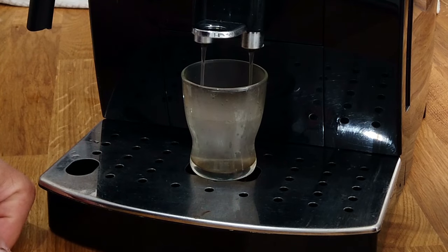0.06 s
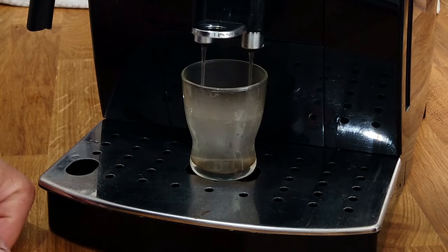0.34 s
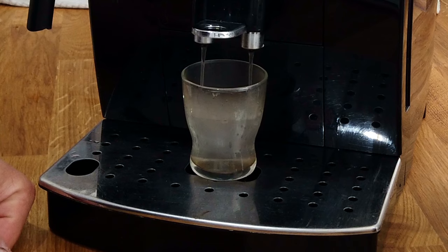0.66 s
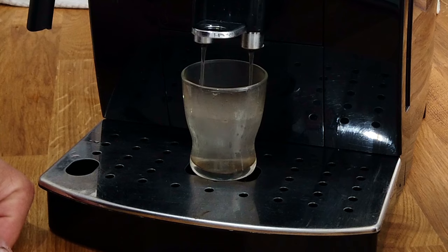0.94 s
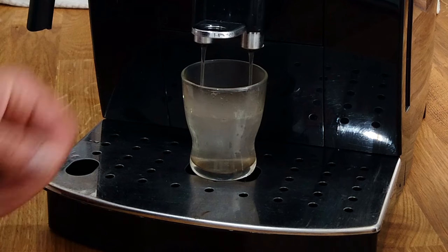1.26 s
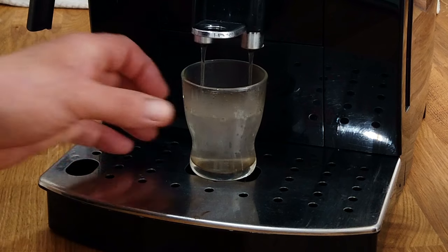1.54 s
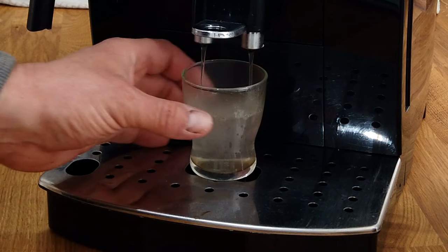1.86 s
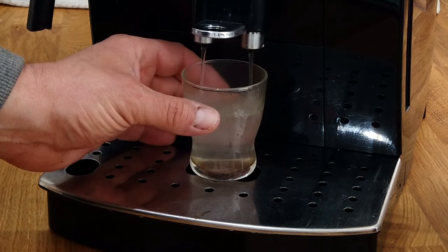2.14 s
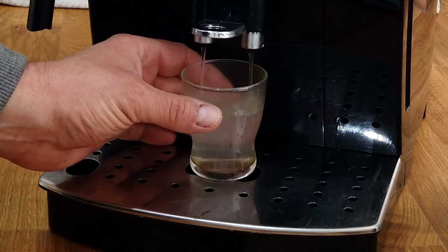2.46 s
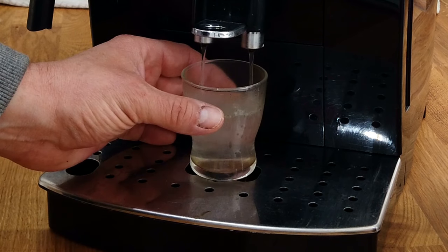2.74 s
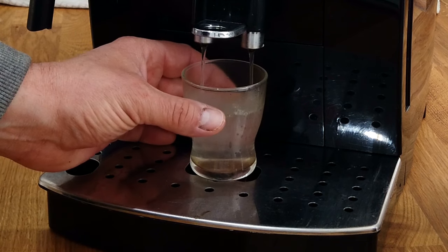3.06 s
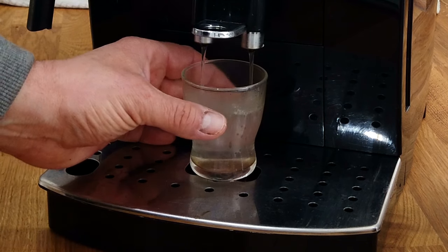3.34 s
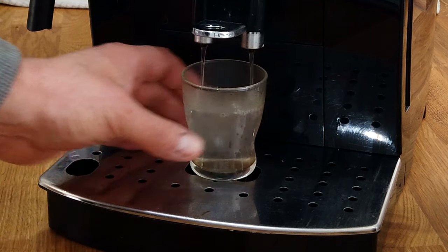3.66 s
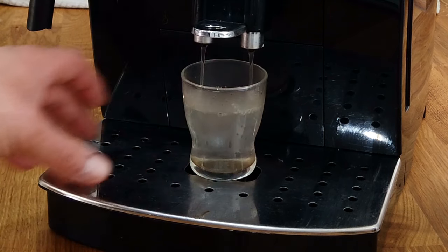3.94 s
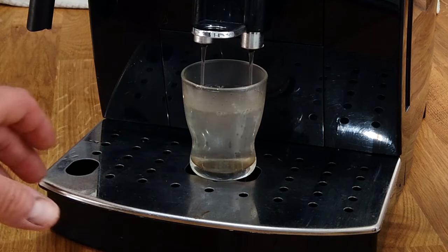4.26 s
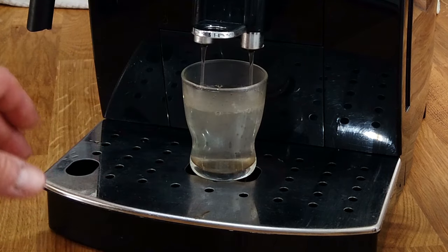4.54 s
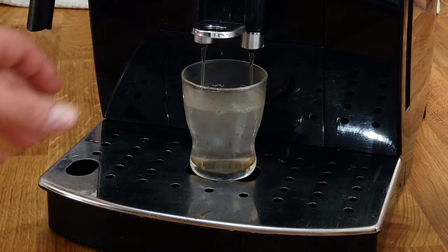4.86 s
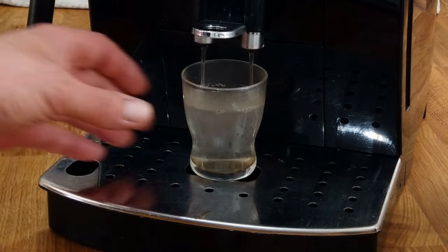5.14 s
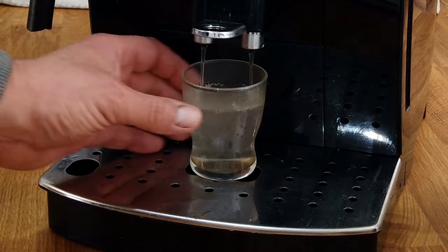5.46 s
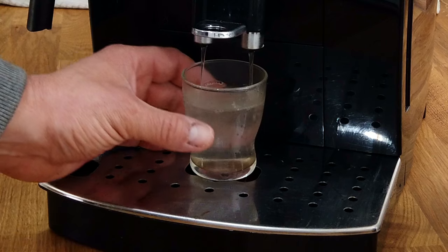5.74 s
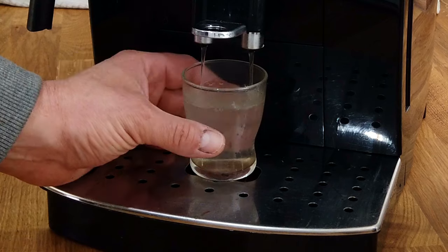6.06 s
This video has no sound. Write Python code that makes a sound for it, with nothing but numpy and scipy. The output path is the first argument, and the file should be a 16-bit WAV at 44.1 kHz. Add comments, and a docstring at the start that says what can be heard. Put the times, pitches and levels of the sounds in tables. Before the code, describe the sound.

A coffee machine pump throbs and rattles rapidly while hot water trickles and plinks into a glass.

```python
"""A coffee machine runs hot water into a glass. From the start its vibrating pump is on for a few mains
cycles in every eight, six throbs a second: the piston thumps and clacks, panels rattle, the valve hisses,
the water line hoots. Drops plink in the glass. At 3.6 s a hand sets the glass on the drip tray: the
plinks end, the casing is damped and rings differently. The water line sings a few short notes, the valve
sizzles from 5.6 s, and at 6.2 s the glass is dragged off."""
import sys
import numpy as np
from scipy.fft import rfft, irfft, next_fast_len
from scipy.io import wavfile
from scipy.ndimage import map_coordinates

SR = 44100
rng = np.random.default_rng(int(sys.argv[2]) if len(sys.argv) > 2 else 0)


def waveform_to_disk(signal):
    """Save audio, clipped to [-1, 1], as 16-bit WAV at the path in sys.argv[1]."""
    frames = np.transpose(np.atleast_2d(signal))
    scaled = np.clip(frames, -1, 1) * 32767
    samples = np.round(scaled).astype(np.int16)
    wavfile.write(sys.argv[1], SR, samples)


N = 277830

MAINS_HZ, FIRST_BURST_S = 49.885, 0.062
BURST_PERIOD_S = 8 / MAINS_HZ
DROPS_END_S, SET_DOWN_S, SIZZLE_START_S = 3.42, 3.59, 5.57

# Trickle spectrum: (frequency [Hz], level [dB])
STREAM_SPECTRUM = [(20, -18), (40, -29), (70, -4), (110, 16), (250, 13.5), (700, 12), (1200, -6.5),
                   (2100, -6.5), (3800, -11.5), (5200, -13.5), (10000, -23.5), (15800, -30)]
# Water spits; loudest drops: (time [s], relative level [dB], frequency [Hz])
WATER_SPITS = [(0.1935, -41.5, 7400), (1.2856, -39.5, 4550), (1.6127, -33.5, 5060), (2.0093, -37, 5020),
               (2.2563, -40, 4530), (3.248, -38, 4900), (3.3283, -38, 5250), (6.1659, -35, 4900)]
LOUD_DROPS = [(0.1015, -28.5, 1780), (0.1295, -25, 1920), (0.2688, -31, 1960), (0.396, -30, 1980),
              (0.4479, -29, 2140), (0.6484, -28, 2170), (1.0156, -30, 1940), (1.1552, -25, 1903),
              (1.32, -27, 2100), (1.3596, -22.5, 2090), (1.699, -30.5, 2000), (2.0012, -25.5, 1900),
              (2.1615, -24.5, 2180), (2.2283, -27.5, 1960), (2.783, -31.5, 2000), (2.9112, -20, 1925),
              (3.0606, -28, 2060), (3.077, -29.5, 2020), (3.1815, -30.5, 2200)]
# Light taps on the glass: (time [s], relative level [dB])
GLASS_TAPS = [(0.653, -44), (1.502, -43), (1.932, -44), (2.913, -45), (3.3715, -43.5), (3.535, -44),
              (3.6404, -42.5), (4.199, -37.5)]
# Glass knocks on the tray: (time [s], relative level [dB], tray note [Hz])
TRAY_KNOCKS = [(3.599, -28, 264), (3.639, -32, 272), (4.924, -39, 270), (6.248, -29, 201),
               (6.263, -34.5, 177)]
# Glass sliding on steel: (time [s], level [dB])
DRAG_ENVELOPE = [(6.22, -82), (6.245, -62), (6.27, -40), (6.3, -30.5)]
# Knock and scrape spectra: (frequency [Hz], level [dB])
KNOCK_SPECTRUM = [(60, -11), (150, -12), (260, 2.5), (400, -6), (700, -11.5), (1300, -13.5), (2500, -22),
                  (6000, -39), (15000, -45)]
SCRAPE_SPECTRUM = [(60, -22), (150, 7), (380, 7), (800, -10), (1300, -4), (2400, -14), (4500, -16.5),
                   (5700, -5), (6600, -24), (15000, -29)]
# Water line hoot: (frequency [Hz], relative level glass held [dB], relative level glass seated [dB])
HOOT_PARTIALS = [(524.5, -38, -47.5), (606, -42.5, -42.5), (683.6, -44, -39.5), (741.4, -41, -50)]
# Single water line notes: (time [s], level [dB], frequency [Hz], Gaussian width [s])
LINE_NOTES = [(3.85, -39, 665, .016), (4.80, -33.5, 745, .02), (4.887, -31, 700, .008),
              (5.046, -29.5, 701, 0.011), (5.137, -33.5, 695, 0.016)]
# Valve hiss spectrum: (frequency [Hz], level [dB])
VALVE_SPECTRUM = [(1470, 2), (2500, 3), (3220, 0), (3640, -3.5), (4950, 2), (6570, -4), (7370, 0),
                  (8660, -6), (9350, -32), (9640, -6), (11000, -11.5), (12200, -11), (15600, -21.5)]
# Panel spectra with glass held, with glass seated, near the end: (frequency [Hz], level [dB])
PANEL_HELD_SPECTRUM = [(490, -5), (830, 3), (914, 2), (1000, -3), (1170, 5), (1430, -2.5), (1790, -3.5),
                       (1960, -4.5), (2320, -10), (3320, -17), (3500, -50), (4550, -76), (7700, -120)]
PANEL_SEATED_SPECTRUM = [(490, -1), (830, 1.5), (1020, 2), (1100, 0.5), (1380, -7), (1700, -6),
                         (1880, -10.5), (2070, -1.5), (2260, -16.5), (3160, -7.5), (3500, -25), (4550, -11),
                         (7700, -120)]
PANEL_LATE_SPECTRUM = [(490, -18), (830, -3.5), (845, -28), (871, -12), (919, -4), (1110, -13.5),
                       (1570, -19), (2020, -14), (2200, -14.5), (2380, -24), (3500, -56), (4550, -60),
                       (7700, -120)]
# Low housing modes; casing and drip tray modes:
# (frequency [Hz], bandwidth [Hz], level glass held [dB], level glass seated [dB])
HOUSING_MODES = [(116.2, 5.3, 10.5, 9), (118.7, 21.2, 1, -1.5), (220.1, 35.7, 1, -4), (233.5, 7.4, 4, 4.5),
                 (324.5, 86, -9, -11), (336.7, 43.7, -6, -11)]
CASING_MODES = [(419.4, 21.3, 3, -4.5), (435, 10.2, 3.5, -1), (516, 17.5, -4.5, -14),
                (558.8, 19.5, 1, -2.5), (593, 27.6, -2.5, -7), (649, 12.4, 1.5, -6), (732.2, 48, -2, -3),
                (743.1, 25, -1.5, 0), (865, 15, -4, -1.5), (900, 24, -17, -9.5)]
# Drift of pump effort: (time [s], level [dB])
PUMP_EFFORT = [(0.0, 1), (0.8, -0.6), (2.0, 0.0), (3.15, 1.06), (3.7, -0.8), (4.3, -0.4), (5.3, -0.9),
               (5.8, 0.8), (6.3, -0.3)]


def amp(db):
    """Decibels to gain."""
    return 10 ** (np.asarray(db) / 20)


def unit(x):
    """Scale to rms 1."""
    return x / np.sqrt(np.mean(x ** 2) + 1e-20)


def clock():
    """Sample times [s]."""
    return np.arange(N) / SR


def curve(points):
    """(time [s], value) points, interpolated per sample."""
    return np.interp(clock(), *np.transpose(points))


def wobble(knots_per_s):
    """Smooth random curve."""
    return map_coordinates(rng.standard_normal(int(N * knots_per_s / SR) + 4), [clock() * knots_per_s])


def add(track, start_s, sound):
    """Mix a sound into the track."""
    part = track[round(start_s * SR):][:len(sound)]
    part += sound[:len(part)]


def filtered(x, response):
    """Apply a complex frequency response."""
    size = next_fast_len(len(x) + SR // 2)
    return irfft(rfft(x, size) * response(np.fft.rfftfreq(size, 1 / SR)), size)[:len(x)]


def coloured(x, spectrum):
    """Shape by (frequency [Hz], level [dB]) points; rms 1."""
    points_hz, db = np.transpose(spectrum)
    return unit(filtered(x, lambda hz: amp(np.interp(np.log(hz + 1), np.log(points_hz), db))))


def resonate(x, modes):
    """Resonators of alternating sign, (frequency [Hz], bandwidth [Hz], level [dB]); rms 1."""
    def response(hz):
        return sum((-1) ** k * amp(db) * 1j * hz * width_hz / (mode_hz ** 2 - hz ** 2 + 1j * hz * width_hz)
                   for k, (mode_hz, width_hz, db) in enumerate(modes))
    return unit(filtered(x, response))


def ping(hz, t60_s):
    """Damped sine."""
    t = np.arange(6000) / SR
    return np.sin(2 * np.pi * hz * t) * amp(-60 * t / t60_s)


def puff(hz, width_hz, t60_s):
    """Decaying noise, band-passed twice."""
    t = np.arange(6000) / SR
    band = [(hz, width_hz, 0)]
    return resonate(resonate(rng.standard_normal(len(t)), band), band) * amp(-60 * t / t60_s)


def seating(held, seated):
    """Cross-fade as the glass settles on the tray."""
    share = np.clip((clock() - SET_DOWN_S) / 0.28, 0, 1)
    return (1 - share) * held + share * seated


def burst_time(lead_s=0):
    """Time since pump switch-on [s], counting from -lead_s."""
    return (clock() - FIRST_BURST_S + lead_s) % BURST_PERIOD_S - lead_s


def burst(rise_s, hold_s, fall_db_per_s, rest_db):
    """Burst envelope: builds, holds while the coil is fed, decays to a floor."""
    lead_s = 0.0014  # coil pulls ahead of the first stroke
    t = burst_time(lead_s) + lead_s
    running = (1 - np.exp(-t / rise_s)) * amp(-fall_db_per_s * np.maximum(t - hold_s, 0))
    return np.hypot(running, amp(rest_db))


def small_drops(rate_per_s):
    """Lesser random drops: (time [s], relative level [dB], frequency [Hz])."""
    gap, strength, pitch = rng.random((60, 3)).T - 0.5
    times_s = np.cumsum(1 + gap) / rate_per_s
    rows = np.column_stack([times_s, -33.5 + 5 * strength, 1945 + 350 * pitch])
    return rows[times_s < DROPS_END_S]


def water():
    """Water trickles and spits; drops splash, ring as bubbles and echo in the glass."""
    out = amp(-44.5) * coloured(rng.standard_normal(N), STREAM_SPECTRUM)
    droplets = (rng.random(N) < 70 / SR) * rng.random(N)
    patter = resonate(droplets, [(1924, 44, 3.5), (2170, 200, -5), (3550, 160, -14)])
    for start_s, db, hz in WATER_SPITS:
        add(out, start_s, amp(db - 3.5) * puff(hz, width_hz=2000, t60_s=0.035))
    for start_s, db, hz in [*LOUD_DROPS, *small_drops(rate_per_s=2.1)]:
        bubble = ping(hz, t60_s=0.026 * np.exp(0.2 * rng.standard_normal()))
        echo = amp(-14.5) * puff(hz, width_hz=600, t60_s=0.1)
        attack = amp(-16.5) * puff(hz, width_hz=1200, t60_s=0.014)
        splash = amp(-42 + 2 * rng.standard_normal()) * puff(6040, width_hz=3100, t60_s=0.0068)
        add(out, start_s, amp(db + 1) * (bubble + echo + attack) + splash)
    return out + amp(-51.5) * seating(patter, 0)


def glass():
    """The glass rings when tapped, knocks on the tray, then scrapes across it."""
    drag = amp(curve(DRAG_ENVELOPE)) * (clock() > DRAG_ENVELOPE[0][0])
    out = drag * coloured(rng.standard_normal(N), SCRAPE_SPECTRUM)
    for start_s, db in GLASS_TAPS:
        tink = puff(3200, width_hz=830, t60_s=0.081) + amp(-5) * ping(3270, t60_s=0.2)
        add(out, start_s, amp(db - 2) * tink)
    t = np.arange(SR // 4) / SR
    for start_s, db, hz in TRAY_KNOCKS:
        thud = coloured(rng.standard_normal(len(t)), KNOCK_SPECTRUM) + amp(1) * np.sin(2 * np.pi * hz * t)
        add(out, start_s, amp(db - 60 * t / 0.2) * thud)
    return out


def line_notes():
    """The water line sings single clear notes that swell and fade."""
    t = clock()
    return sum(amp(db) * np.exp(-0.5 * ((t - crest_s) / width_s) ** 2) * np.sin(2 * np.pi * hz * t)
               for crest_s, db, hz, width_s in LINE_NOTES)


def hoot(crest_s, width_s, sag_per_s):
    """One swell per burst, sagging in pitch."""
    t = burst_time(lead_s=0.04)
    swell = np.exp(-0.5 * ((t - crest_s) / width_s) ** 2)
    warped_s = t - sag_per_s * (t - crest_s) ** 2
    partials = sum(amp(seating(held_db, seated_db)) * np.sin(2 * np.pi * hz * warped_s + 0.9 * wobble(3))
                   for hz, held_db, seated_db in HOOT_PARTIALS)
    return np.sqrt(2) * swell * amp(0.8 * wobble(4)) * partials


def line_hoots(effort_db):
    """The water line hoots as the pump cuts in and out."""
    cut_in = hoot(crest_s=0.012, width_s=0.0082, sag_per_s=0.95)
    cut_out = hoot(crest_s=0.078, width_s=0.042, sag_per_s=0.29)
    return amp(1.63 + 0.72 * effort_db) * (cut_in + amp(-10.5) * cut_out)


def chatter(fresh_share):
    """Dense contacts: noise that repeats every burst, plus a share that never does."""
    pattern = np.resize(rng.standard_normal(round(BURST_PERIOD_S * SR)), N)
    return np.sqrt(1 - fresh_share) * pattern + np.sqrt(fresh_share) * rng.standard_normal(N)


def casing_ripple(x, depth_db, spacing_hz):
    """Many small casing resonances add narrow peaks and dips; rms 1."""
    knots = rng.standard_normal(2000)
    return unit(filtered(x, lambda hz: amp(depth_db * map_coordinates(knots, [hz / spacing_hz], order=1))))


def valve(effort_db):
    """Each stroke squirts water through the valve: hiss, faint whistle, late sizzle."""
    envelope = burst(rise_s=0.00088, hold_s=0.088, fall_db_per_s=336, rest_db=-16.5)
    level_db = -50.5 + 0.98 * effort_db + 0.84 * wobble(14)
    squirt = amp(1.5 * np.cos(2 * np.pi * MAINS_HZ * (burst_time() - 0.004)))
    jet = envelope * squirt * casing_ripple(chatter(fresh_share=0.87), depth_db=1.8, spacing_hz=70)
    whistle = resonate(envelope * rng.standard_normal(N), [(7370, 170, 5.2), (9130, 92, 13)])
    sizzle = np.clip(clock() - SIZZLE_START_S, 0, 1) * resonate(jet, [(4870, 700, 0)])
    return amp(level_db) * (coloured(jet, VALVE_SPECTRUM) + amp(-14.5) * whistle) + amp(-57.5) * sizzle


def panels(effort_db):
    """Loose panels buzz while the piston moves; the buzz dulls from 5.1 s."""
    envelope = burst(rise_s=0.011, hold_s=0.098, fall_db_per_s=240, rest_db=-27)
    level_db = -45.5 + effort_db + seating(0, -0.25)
    buzz = envelope * casing_ripple(chatter(fresh_share=0.78), depth_db=4, spacing_hz=45.65)
    late = np.clip((clock() - 5.1) / 0.5, 0, 1)
    seated = (1 - late) * coloured(buzz, PANEL_SEATED_SPECTRUM) + late * coloured(buzz, PANEL_LATE_SPECTRUM)
    return amp(level_db) * seating(coloured(buzz, PANEL_HELD_SPECTRUM), seated)


def body(x, modes):
    """Ring modes whose levels shift once the glass is seated."""
    table = np.array(modes)
    return seating(resonate(x, table[:, [0, 1, 2]]), resonate(x, table[:, [0, 1, 3]]))


def mounts_and_casing(blows):
    """Rubber mounts blunt each blow; bending waves, slower at low pitch, smear it."""
    blunted = filtered(blows, lambda hz: 1 / (1 + (hz / 1300) ** 6))
    return filtered(blunted, lambda hz: np.exp(-2j * np.pi * 0.21 * np.sqrt(hz)))


def strokes(delay_s, scatter_db):
    """One impulse per mains cycle."""
    times_s = FIRST_BURST_S + delay_s + np.arange(-4, N / SR * MAINS_HZ) / MAINS_HZ
    sizes = amp(scatter_db * rng.standard_normal(len(times_s)))
    inside = (times_s >= 0) & (times_s < (N - 1) / SR)
    return np.bincount(np.round(times_s[inside] * SR).astype(int), sizes[inside], N)


def pump_thump(effort_db):
    """The pump body builds up its swing on the mounts and thumps the housing."""
    swing = burst(rise_s=0.018, hold_s=0.1012, fall_db_per_s=543, rest_db=-23)
    level_db = -36 + 0.44 * effort_db + seating(0, -3)
    return amp(level_db) * body(swing * strokes(delay_s=0.0035, scatter_db=0.5), HOUSING_MODES)


def piston_clack(effort_db):
    """The piston hits one end stop and springs back to the other; churning water shakes the casing too."""
    envelope = burst(rise_s=0.0034, hold_s=0.086, fall_db_per_s=800, rest_db=-24.5)
    level_db = -38.5 + 1.9 * effort_db + seating(0, -1.5)
    pull = strokes(delay_s=0.0022, scatter_db=0.8)
    rebound = amp(-4.5) * strokes(delay_s=0.0062, scatter_db=1.2)
    clacks = body(envelope * (pull + rebound), CASING_MODES)
    churn = coloured(rng.standard_normal(N), [(80, -54), (200, 31), (400, -6.5), (750, -16.5), (1200, -54)])
    return amp(level_db) * (clacks + amp(-9) * body(envelope * churn, CASING_MODES))


def scene():
    """Machine, glass and water, close by; mono."""
    effort_db = curve(PUMP_EFFORT)
    pump = mounts_and_casing(pump_thump(effort_db) + piston_clack(effort_db))
    machine = pump + line_hoots(effort_db) + line_notes() + panels(effort_db) + valve(effort_db)
    return (machine + glass() + water())[None]


def record(dry):
    """Bass roll-off at 60 Hz, band limit at 15.8 kHz."""
    return np.array([filtered(dry[0], lambda hz: (hz < 15800) * hz ** 2 / (hz ** 2 + 60 ** 2))])


dry = scene()
out = record(dry)
waveform_to_disk(out)
```